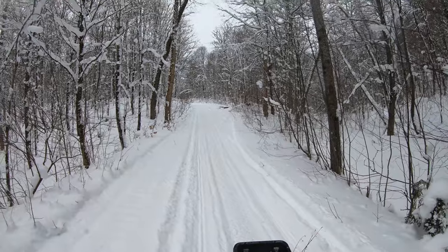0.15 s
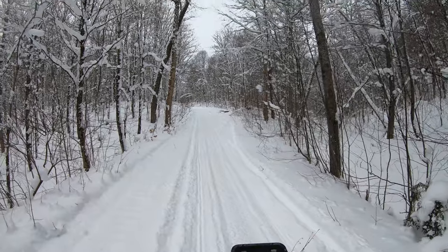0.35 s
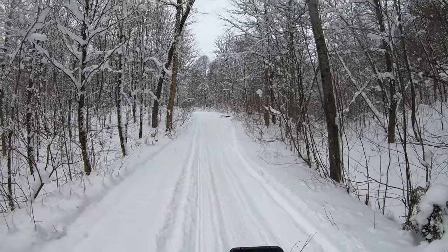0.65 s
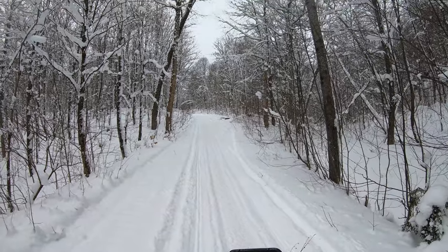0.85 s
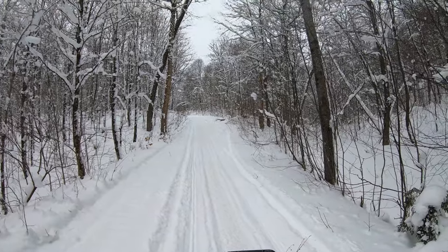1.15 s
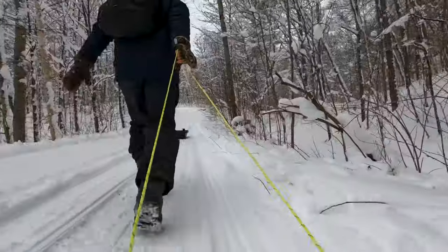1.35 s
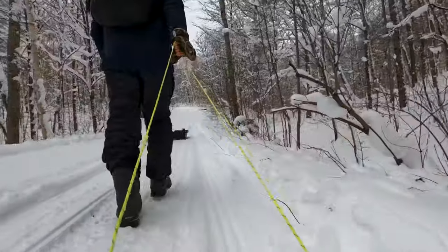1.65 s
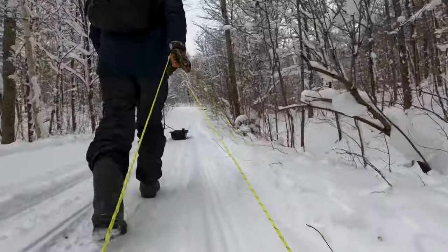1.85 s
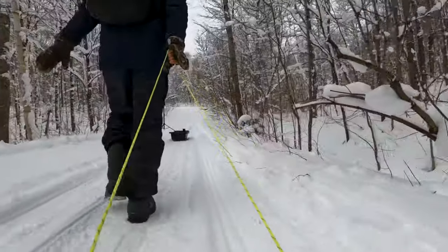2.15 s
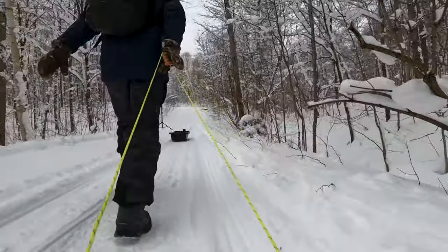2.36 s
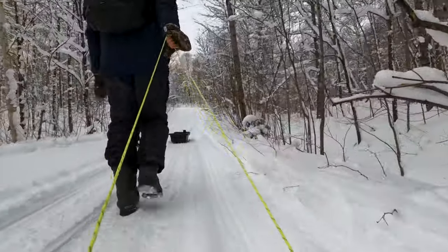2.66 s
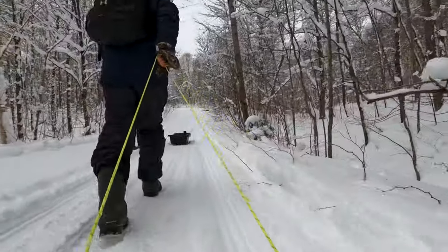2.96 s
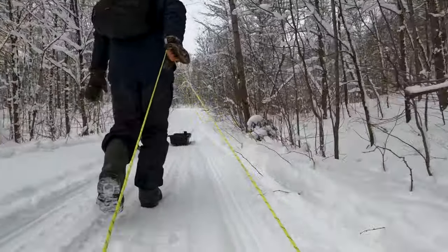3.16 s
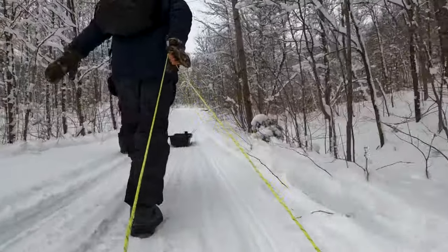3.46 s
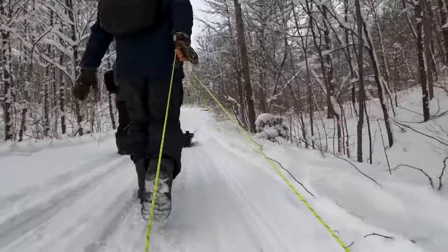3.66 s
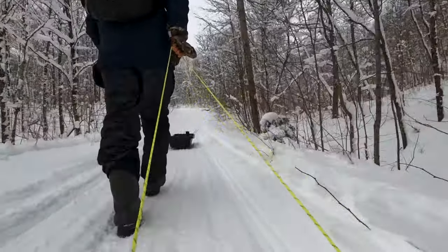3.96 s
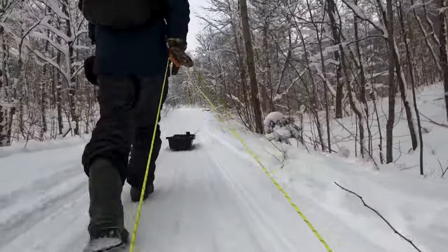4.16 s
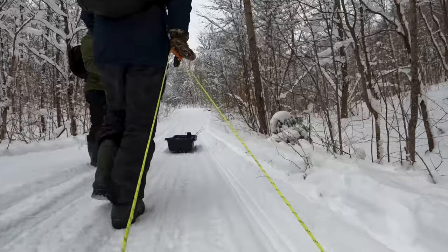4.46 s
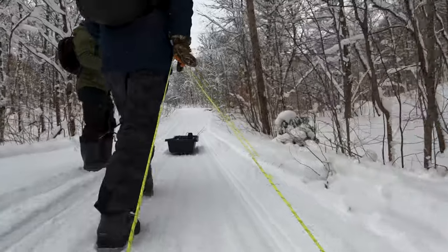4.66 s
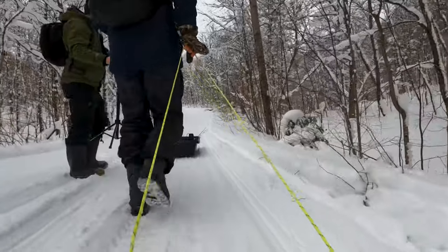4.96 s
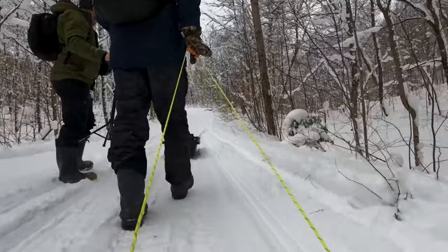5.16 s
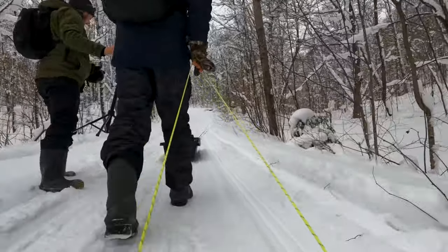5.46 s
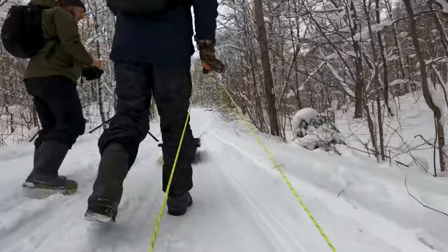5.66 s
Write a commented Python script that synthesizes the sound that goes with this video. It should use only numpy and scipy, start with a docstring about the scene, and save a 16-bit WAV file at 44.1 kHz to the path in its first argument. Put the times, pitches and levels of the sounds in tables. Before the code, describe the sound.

A plastic sled slides along a packed snow trail, heard from on board: a loud rumbling scrape with grainy hiss, low thuds and brittle crunches. Before it starts, there is a short, quieter stretch of gloves rustling and creaking on the camera, a sharp click with a thump, and a tiny gap. Late in the ride comes the hardest knock and a deep shudder, then more bumpy sliding.

```python
"""A snowy forest trail. First, close up, gloves rustle on a hand-held camera: the grip creaks in dull
pops, taps ring the case, and a button's click briefly ducks the level and comes with a low thump of air.
After a blink of silence, at 1.38 s, we ride a plastic sled: the hull rumbles and scrapes while packed
snow hisses and squeaks under it. Ridges thud, and crust crunches, knocks and snaps against the plastic.
Just after 4 s comes the hardest knock, a short hop and a deep shake, and the sled bumps on."""
import sys
import numpy as np
from scipy import signal
from scipy.fft import rfft, irfft, next_fast_len
from scipy.io import wavfile
from scipy.ndimage import uniform_filter1d

SR = 44100
rng = np.random.default_rng(int(sys.argv[2]) if len(sys.argv) > 2 else 0)


def store_pcm(level_fs):
    """Save levels as 16-bit WAV."""
    pcm = np.round(np.clip(level_fs, -1, 1) * 32767).astype(np.int16)
    wavfile.write(sys.argv[1], SR, np.atleast_2d(pcm).T)


N = 256568
TIME = np.arange(N) / SR
FFT_SIZE = next_fast_len(N)
BIN_HZ = np.maximum(np.arange(FFT_SIZE // 2 + 1) * SR / FFT_SIZE, 1)


def from_db(db):
    """Decibels to gain."""
    return 10 ** (np.asarray(db) / 20)


def unit_rms(x):
    """Scale to rms 1."""
    return x / np.sqrt(np.mean(x ** 2) + 1e-20)


def faders(rows):
    """Columns of a timed table as curves, one value a sample."""
    times, *columns = np.transpose(rows)
    return [np.interp(TIME, times, column) for column in columns]


def at_hz(curve, hz):
    """Read a curve on a log frequency axis."""
    points_hz, values = np.transpose(curve)
    return np.interp(np.log(hz), np.log(points_hz), values)


def drift(rate_hz):
    """Smooth random wander of rms 1."""
    pole = np.exp(-32 * np.pi * rate_hz / SR)   # one step every 16 samples
    slow = signal.lfilter([1], [1, -2 * pole, pole * pole], rng.standard_normal(N // 16 + 2002))[2000:]
    return np.interp(np.arange(N) / 16, np.arange(len(slow)), unit_rms(slow))


def colour(x, eq):
    """Shape a signal with an EQ curve."""
    return irfft(rfft(x, FFT_SIZE) * from_db(at_hz(eq, BIN_HZ)), FFT_SIZE)[..., :N]


def filtered(x, order, hz, kind="low"):
    """Low-, high- or band-pass filter."""
    return signal.sosfilt(signal.butter(order, hz, kind, fs=SR, output="sos"), x)


def ring(clicks, hz, t60):
    """Resonator: a unit click starts a decaying sine of height 1."""
    r, w = from_db(-60 / (t60 * SR)), 2 * np.pi * hz / SR
    return signal.lfilter([0, np.sin(w)], [1, -2 * r * np.cos(w), r * r], clicks + 1e-18)


def grains(per_s, spread_db):
    """Random clicks of uneven size and sign; rms 1."""
    sizes = from_db(spread_db * np.minimum(rng.exponential(1, N), 5)) * rng.choice([-1, 1], N)
    return unit_rms(sizes * (rng.random(N) < per_s / SR))


def arch(start, length):
    """Half-sine swell from 0 to 1 and back."""
    return np.sin(np.pi * np.clip((TIME - start) / length, 0, 1))


def pops(events, t60_cycles, rise_cycles):
    """Short pitched hits: damped sines with a soft attack."""
    out = np.zeros(N)
    for start, peak_db, hz in events:
        at = round(start * SR)
        cycles = np.arange(int(t60_cycles / hz * SR)) * hz / SR
        envelope = (1 - np.exp(-cycles / rise_cycles)) * from_db(-60 * cycles / t60_cycles)
        hit = envelope / envelope.max() * np.sin(2 * np.pi * cycles)
        out[at:at + len(hit)] += from_db(peak_db) * hit[:N - at]
    return out


# Stereo image at the two microphone ports: f/Hz, left-right correlation
PORT_LIKENESS = [(60, 0.31), (130, 0.95), (290, 1), (640, 0.27), (1410, -0.52), (3100, 0.33),
                 (6820, -0.017), (15000, -0.1)]
# Their pan: f/Hz, left minus right/dB
PORT_BALANCE = [(60, -10), (240, 4), (950, -6.5), (3770, -5), (15000, -9.5)]
def at_ports(noise_pair, eq):
    """Colour two unrelated noises and give them the width and pan of the ports; rms 1."""
    alike = np.clip(at_hz(PORT_LIKENESS, BIN_HZ), -1, 1)
    tilt = from_db(at_hz(PORT_BALANCE, BIN_HZ) / 2)
    mid, side = rfft(colour(noise_pair, eq), FFT_SIZE)
    mid, side = np.sqrt(1 + alike) * mid, np.sqrt(1 - alike) * side
    return unit_rms(irfft([(mid + side) * tilt, (mid - side) / tilt], FFT_SIZE)[:, :N])


# Faders of the handling bed: t/s, grip/dB, glove/dB, buzz/dB
HANDLING_FADERS = [(0.0, -40, -52.5, -52.5), (0.116, -43, -57, -50.5), (0.282, -44.5, -52.5, -50),
                   (0.7, -43, -49, -48), (0.858, -42.5, -46.5, -52), (0.968, -52, -50, -51.5),
                   (1.22, -48, -49, -47)]
# EQs of the dull grip, bright glove and midrange case buzz: f/Hz, level/dB
GRIP_EQ = [(65, -45), (110, -13.5), (183, -3.5), (482, -10.5), (617, -15), (900, -18), (1170, -21),
           (1980, -120)]
GLOVE_EQ = [(1300, -40), (2200, -15), (3000, -2.5), (5100, -5), (6000, -3), (8200, 1), (9500, -9),
            (11000, -22.5), (15000, -31), (16500, -60)]
BUZZ_EQ = [(410, -46), (700, -27), (1350, -7.5), (1590, -11), (1910, -11.5), (2400, -19), (3120, -20.5),
           (4000, -70)]
def handling():
    """A gloved hand shifts on the camera: low grip noise, cloth rustle and a buzz of the case."""
    grip_db, glove_db, buzz_db = faders(HANDLING_FADERS)
    grip = at_ports(rng.standard_normal((2, N)) * from_db(3.2 * drift(48)), GRIP_EQ)
    glove = at_ports(rng.standard_normal((2, N)) + 0.84 * grains(900, 3.6), GLOVE_EQ)
    buzz = at_ports(rng.standard_normal((2, N)) * from_db(3.4 * drift(59)), BUZZ_EQ)
    # small slips keep the lowest case mode ringing, out of phase at the ports
    buzz += from_db(1.5) * unit_rms(ring(grains(140, 4.7), hz=1350, t60=0.018)) * [[1], [-1]]
    return from_db(grip_db) * grip + from_db(glove_db) * glove + from_db(buzz_db) * buzz


# Jolts of the hand: t/s, level/dB
JOLTS = [(0.0, -55), (.272, -52), (.45, -47), (.762, -37.5), (.85, -48), (.978, -48), (1.224, -40),
         (1.275, -27)]
def jolts(rise_s=0.027, t60=0.21, floor_db=-84):
    """The hand jolts the camera: a deep rumble swells quickly and dies away."""
    eq = [(12, -33), (25, 1), (60, 9), (110, -25), (300, -70)]   # f/Hz, level/dB
    rumble = unit_rms(colour(rng.standard_normal((2, N)), eq))
    envelope = from_db(floor_db)
    for peak_s, level_db in JOLTS:
        attack = np.clip(1 + (TIME - peak_s) / rise_s, 0, 1)
        envelope = envelope + attack * from_db(level_db - 60 * np.maximum(TIME - peak_s, 0) / t60)
    return envelope * rumble


# Creaks of the grip: t/s, level/dB, f/Hz
CREAKS = [(0.018, -36, 297), (0.053, -38, 301), (0.083, -41, 487), (0.118, -38, 320), (0.134, -36, 315),
          (0.246, -32, 400), (0.333, -30, 334), (0.379, -41, 282), (0.418, -42, 290), (0.507, -39, 320),
          (0.53, -35, 452), (0.572, -33, 450), (0.589, -34, 404), (0.607, -30, 410), (0.638, -28, 410),
          (0.659, -29, 417), (0.701, -29, 484), (0.711, -34, 517), (0.751, -28, 490), (0.769, -27.5, 340),
          (0.805, -35, 266), (0.832, -24.5, 447), (0.84, -24.5, 366)]
def creaks():
    """The grip creaks in dull pops, each with a dry tick on its front."""
    starts, level_db, _ = np.transpose(CREAKS)
    ticks = np.zeros(N)
    ticks[np.round(starts * SR).astype(int)] = from_db(np.minimum(level_db, -34) - 9)
    return pops(CREAKS, t60_cycles=6.9, rise_cycles=0.6) + ring(ticks, hz=1800, t60=0.004)


# One scuff: t/s, length/s, f/Hz, level/dB
CASE_SCUFF = (.07, .14, 3200, -54)
def scuff():
    """A faint scuff on the case: narrow noise that swells and fades."""
    start, length, hz, level_db = CASE_SCUFF
    band = unit_rms(ring(rng.standard_normal((2, N)), hz, t60=0.0049))
    return from_db(level_db) * arch(start, length) * band


# Glove strokes: t/s, level/dB, attack/s, length/s, low crackle against bright/dB
SWISHES = [(0.09, -64, 0.034, 0.052, 22), (0.452, -37, 0.008, 0.043, 0),
           (0.746, -34.5, 0.013, 0.044, -13.5), (0.824, -53, 0.016, 0.046, 4),
           (0.936, -43.5, .02, 0.037, -46), (1.067, -44.5, 0.014, 0.052, -2.5),
           (1.177, -47.5, .02, 0.043, -1)]
def swishes(release_s=0.008):
    """A glove brushes the case in crackly strokes that rise, hold and fade quickly."""
    bright = rng.standard_normal((2, N)) * from_db(4.0 * drift(86)) + 0.45 * grains(700, 3.5)
    bright = at_ports(bright, GLOVE_EQ)
    crackle = at_ports(rng.standard_normal((2, N)) + 1.7 * grains(500, 4.1), BUZZ_EQ)
    out = np.zeros((2, N))
    for start, level_db, attack_s, length, crackle_db in SWISHES:
        attack = np.clip((TIME - start) / attack_s, 0, 1)
        release = np.clip((start + length - TIME) / release_s + 1, 0, 1)
        out += from_db(level_db) * attack * release * (bright + from_db(crackle_db) * crackle)
    return out


# Taps, ending on the button: t/s, level/dB, upper mode boost/dB, right gain of the two lowest modes
TAPS = [(0.1235, -33, -18, -0.6), (0.247, -39, -11, -0.66), (0.4517, -31.5, 6, -0.69),
        (0.4778, -46, 12, -1.1), (0.493, -47, -1, -0.54), (0.78, -45, 9, -0.63), (1.216, -41, -20, -0.65),
        (1.2729, -51, 5, -1.1), (1.2832, -18, 18, -1.65)]
# Modes of the case: f/Hz, level/dB, t60/s
CASE_MODES = [(1406, 18, 0.0069), (2760, 5, 0.0013), (4600, -9, 0.0051), (5900, -15, 0.0034),
              (7500, 5.5, 0.00054)]
# Touches within one tap: offset/s, level/dB
CHATTER = [(-0.0003, -14), (0.0, 0), (0.0004, -1), (0.0008, -14)]
def case_taps():
    """Each tap chatters on the case modes; the two lowest reach the ports out of phase."""
    starts, tap_db, upper_db, right_gain = np.transpose(TAPS)
    at, out = np.round(starts * SR).astype(int), np.zeros((2, N))
    for mode, (hz, mode_db, t60) in enumerate(CASE_MODES):
        drive = np.zeros((2, N))
        drive[:, at] = from_db(tap_db + (mode > 0) * upper_db + mode_db + rng.normal(0, 2.0, len(at)))
        drive[1, at] *= right_gain if mode < 2 else 1
        if mode == 0:   # fed through the mount, it swells first
            drive = ring(drive, hz, t60) * 2 * np.e * np.log(1000) / (t60 * SR)
        else:
            drive = sum(from_db(db) * np.roll(drive, round(lag * SR), axis=1) for lag, db in CHATTER)
        out += ring(drive, hz, t60)
    return filtered(out, 2, 11000)   # soft contact


# Pushes of air: port (0 left, 1 right), t/s, length/s, signed height, low cut/Hz
AIR_PUSHES = [(0, 1.277, .007, .14, 17), (1, 1.277, .007, -.2, 22), (0, 1.2835, .008, .4, 16),
              (1, 1.2835, .0065, -.65, 22), (0, 1.328, .05, .24, 4)]
def button_thump():
    """The finger squeezes air at the ports; a steep low cut makes each push swing on ever more slowly."""
    out = np.zeros((2, N))
    for port, start, length, height, cut_hz in AIR_PUSHES:
        out[port] += filtered(height * arch(start, length) ** 2, 4, cut_hz, "high")
    return out


def ducked(x, threshold_db, release_db_per_s):
    """Gain control: loud peaks turn the gain down, and it recovers slowly."""
    level_db = 20 * np.log10(uniform_filter1d(np.abs(x).max(axis=0), size=64) + 1e-9)
    ramp = release_db_per_s * TIME
    held_db = np.maximum.accumulate(level_db + ramp) - ramp
    over_db = np.maximum(held_db - threshold_db, 0)
    return x * from_db(-signal.lfilter([.006], [1, -.994], over_db))   # attack of about 4 ms


# Faders of the sliding hull: t/s, rumble/dB, scrape/dB
SLIDE_FADERS = [(1.39, -25.5, -27.5), (1.48, -18.5, -26.5), (1.51, -29, -31), (1.55, -22.5, -23.5),
                (1.8, -23.5, -24), (1.83, -12, -29), (1.88, -24, -24.5), (1.96, -12.5, -20),
                (2.0, -18, -24), (2.63, -17, -25), (2.68, -18.5, -25), (2.76, -20, -22.5),
                (2.78, -8.5, -17.5), (2.8, -19.5, -25.5), (3.58, -17.5, -24.5), (3.95, -17, -29),
                (4.13, -22, -28.5), (4.15, -20, -24), (4.17, -19.5, -26.5), (4.28, -23.5, -24.5),
                (4.37, -16.5, -24), (4.65, -23, -26.5), (4.69, -21.5, -28.5), (4.86, -17, -24),
                (4.9, -21, -22.5), (4.92, -14.5, -19), (4.97, -23, -27), (5.06, -14, -19.5),
                (5.17, -22, -26.5), (5.23, -17.5, -22.5), (5.32, -23.5, -27), (5.58, -25, -26),
                (5.69, -22.5, -21), (5.81, -26, -28.5)]
# Hull resonances: f/Hz, width/Hz, level/dB
HULL_MODES = [(144.6, 18, -6), (170, 10.4, -10.5), (230, 40, 1), (290, 63, 1.5), (374, 87, 0),
              (487, 63, -10), (656, 100, -5)]
# Boost of the two lowest resonances: t/s, level/dB
BELLY_FADER = [(1.39, 5.5), (2.5, 5.5), (2.9, -6.5), (3.7, -2), (4.2, 5), (5.2, -5.5), (5.81, 6.5)]
# EQ of the scrape: f/Hz, level/dB
SCRAPE_EQ = [(260, -17), (450, 4), (575, -4.5), (848, 4), (1220, -1), (1410, -13), (1700, -13.5),
             (2210, -48)]
def hull_slide(trail, fine, crust):
    """The uneven trail shoves the hull modes into a rumble while crust grains scrape the plastic."""
    rumble_db, scrape_db = faders(SLIDE_FADERS)
    belly_db, = faders(BELLY_FADER)
    rumble = np.zeros(N)
    for mode, (hz, width_hz, level_db) in enumerate(HULL_MODES):
        shove = rng.standard_normal(N) * from_db(1.24 * trail + 1.67 * drift(3.46))
        resonance = unit_rms(ring(shove, hz, t60=np.log(1000) / np.pi / width_hz))
        rumble += from_db(level_db + (mode < 2) * belly_db) * resonance
    rumble = filtered(rumble, 2, 90, "high")   # the hull radiates little below its lowest mode
    friction = (rng.standard_normal(N) + 0.65 * crust) * from_db(0.85 * trail + 0.5 * fine)
    scrape = colour(friction, SCRAPE_EQ)
    return from_db(rumble_db) * unit_rms(rumble) + from_db(scrape_db) * unit_rms(scrape)


# EQ of packed snow, for squeaks and hiss: f/Hz, level/dB
SNOW_EQ = [(820, -20), (1400, -4), (2400, -9), (3500, -11), (4300, -13), (5000, -14.5), (5600, -12.5),
           (6400, -15.5), (8000, -20.5), (11000, -33.5), (14300, -75)]
def squeaks(per_s=250, t60_cycles=49):
    """Packed snow squeaks under the hull: brief rings scattered over two octaves; rms 1."""
    pitches = np.geomspace(1800, 7000, 14)
    clicks, pitch_index = grains(per_s, 2.0), rng.integers(0, len(pitches), N)
    out = np.zeros(N)
    for k, hz in enumerate(pitches):
        t60 = t60_cycles / hz
        ping = ring(clicks * (pitch_index == k), hz, t60)
        out += from_db(at_hz(SNOW_EQ, hz)) * ring(ping, hz, t60) * hz / SR   # rung twice: soft attack
    return unit_rms(out)


# Faders of the top end: t/s, lower hiss/dB, upper hiss/dB, fizz/dB
HISS_FADERS = [(1.39, -31, -38, -50), (1.51, -33.5, -40.5, -55), (1.55, -22.5, -39, -39),
               (1.57, -32, -39, -52), (1.62, -27, -41, -45), (1.66, -28.5, -35.5, -46.5),
               (1.86, -32.5, -41, -54), (1.91, -29.5, -36.5, -50), (2.03, -31, -41.5, -51),
               (2.09, -29.5, -38, -49), (2.24, -36, -43, -60.5), (2.75, -37, -44.5, -61),
               (3.27, -39, -45.5, -63), (3.38, -32, -39, -54), (3.49, -34.5, -42, -55),
               (3.56, -34.5, -40.5, -56), (3.8, -33.5, -41.5, -57), (3.83, -35.5, -40.5, -52.5),
               (4.13, -33.5, -42.5, -56), (4.15, -33, -40, -43), (4.18, -35, -49, -63),
               (4.21, -31, -41, -57), (4.26, -34.5, -39.5, -52), (4.46, -30, -40, -48.5),
               (4.55, -26.5, -37, -48), (4.59, -33, -40, -49), (4.69, -29.5, -38.5, -52.5),
               (5.34, -33, -42, -56), (5.46, -31, -42.5, -52), (5.81, -28, -42.5, -53.5)]
# The hull skips clear of the snow and the hiss drops: t/s, length/s, level/dB
HOP = (4.166, .03, -6)
# EQs of the thin fizz and of the out-of-phase hiss that adds width: f/Hz, level/dB
FIZZ_EQ = [(10800, -55), (11300, -20), (11900, -1), (12450, 1.5), (13000, -3), (14000, -3.5), (15000, -8),
           (15700, -19), (15900, -51.5)]
SIDE_EQ = [(1000, -19), (3000, -5.5), (6000, 1), (10500, -10), (12000, -60)]
# Pan of the fizz, left then right: level/dB
FIZZ_PAN = [
    [7.5],
    [-5.5],
]
def snow_hiss(trail, fine, crust, split_hz=3480, squeak_db=-11, side_db=-39):
    """Snow rubs under the hull: a grainy, squeaky hiss topped by a fizz, mostly on the left."""
    low_db, high_db, fizz_db = faders(HISS_FADERS)
    friction = (rng.standard_normal(N) + 0.29 * crust) * from_db(0.57 * trail + 0.89 * fine)
    hiss = unit_rms(colour(friction, SNOW_EQ)) + from_db(squeak_db) * squeaks()
    low = signal.sosfiltfilt(signal.butter(2, split_hz, fs=SR, output="sos"), hiss)
    centre = from_db(low_db) * unit_rms(low) + from_db(high_db) * unit_rms(hiss - low)
    fizz = unit_rms(colour(rng.standard_normal((2, N)) * from_db(0.37 * trail + 1.6 * fine), FIZZ_EQ))
    side = unit_rms(colour(rng.standard_normal(N), SIDE_EQ)) * [[1], [-1]]
    mix = centre + from_db(high_db + side_db) * side + from_db(fizz_db + FIZZ_PAN) * fizz
    hop_start, hop_length, hop_db = HOP
    return mix * from_db(hop_db * arch(hop_start, hop_length))


# Fader of the deep shake: t/s, level/dB
SHAKE_FADER = [(1.39, -34), (1.89, -29.5), (3.17, -41.5), (4.13, -38), (4.21, -16.5), (4.31, -34),
               (5.66, -44), (5.74, -29), (5.81, -55)]
# Its EQ: f/Hz, level/dB
SHAKE_EQ = [(15, -28), (28, 8), (55, 7.5), (80, 8), (110, 6.5), (200, -55)]
def shake(trail):
    """The whole sled shakes on the uneven trail: surging sub-bass noise."""
    level_db, = faders(SHAKE_FADER)
    surges = rng.standard_normal(N) * from_db(2.9 * trail + 3.3 * drift(17))
    return from_db(level_db) * unit_rms(colour(surges, SHAKE_EQ))


# Ridges in the trail: t/s, level/dB, f/Hz
THUDS = [(1.454, -9, 185), (1.555, -10, 215), (1.594, -29, 332), (1.648, -11.5, 403), (1.763, -17, 230),
         (1.825, -12, 121), (1.934, -9, 214), (2.028, -8, 220), (2.118, -12, 210), (2.193, -13, 258),
         (2.323, -11, 144), (2.487, -11, 215), (2.56, -16, 220), (2.658, -14, 245), (2.682, -8, 230),
         (2.773, -10, 275), (2.932, -18, 290), (3.473, -9.5, 237), (3.697, -11.5, 284), (3.754, -11, 345),
         (3.861, -8.5, 190), (4.232, -22, 202), (4.293, -10.5, 294), (4.399, -14, 285), (4.439, -10, 254),
         (4.476, -13, 232), (4.562, -8, 265), (4.621, -8, 268), (4.846, -8.5, 230), (4.913, -8, 332),
         (5.05, -14, 327), (5.193, -9.5, 207), (5.225, -6.5, 222), (5.397, -17.5, 262), (5.482, -16.5, 280),
         (5.694, -15.5, 274)]
def thuds():
    """The hull bumps over ridges with low, quickly damped thuds."""
    return pops(THUDS, t60_cycles=20.7, rise_cycles=0.31)


# Breaks in the crust: t/s, level/dB, f/Hz
CRUNCHES = [(1.543, -22, 3970), (1.565, -29, 4500), (1.599, -25, 5000), (1.609, -22, 3800),
            (1.72, -23, 3030), (1.746, -22, 3050), (1.895, -18.5, 2500), (1.928, -20, 2200),
            (2.075, -19.5, 2000), (2.145, -25, 3500), (2.522, -25, 2380), (2.6, -32, 5900),
            (2.6194, -25, 2300), (3.3003, -23.5, 2340), (3.438, -23, 1950), (3.455, -34, 3830),
            (3.488, -23.5, 3100), (4.138, -16.5, 2130), (4.2014, -19, 1920), (4.229, -28, 2380),
            (4.244, -26, 2580), (4.288, -34, 2500), (4.329, -25, 2480), (4.387, -19.5, 2880),
            (4.492, -20, 2760), (4.538, -23, 2250), (4.909, -18, 1920), (5.441, -29, 3940),
            (5.7, -28, 4500)]
def crunches(rise_s=0.0026, t60=0.041, grit_db=3.0):
    """Crust gives way: a snap and a quick swell of grit that rings briefly and crumbles away."""
    out, t = np.zeros(N), np.arange(4000) / SR
    envelope = (1 - np.exp(-t / rise_s)) * from_db(-60 * t / t60)
    for start, level_db, hz in CRUNCHES:
        noise = rng.standard_normal(len(t))
        grit = noise * from_db(grit_db * np.abs(noise))   # a few grains stand out
        band = filtered(grit, 1, [hz / 1.3, hz * 1.6], "band")
        body = unit_rms(band) + 0.97 * unit_rms(ring(grit, hz, t60=0.017))
        snap = unit_rms(np.diff(grit, prepend=0) + 2 * band) * from_db(-18 - 60 * t / 0.017)
        at = round(start * SR)
        out[at:at + len(t)] += from_db(level_db) * (body * envelope + snap)[:N - at]
    return filtered(out, 2, 7500)


# Lumps of crust: t/s, level/dB, f/Hz
KNOCKS = [(1.553, -12, 1110), (1.612, -26, 880), (1.896, -12.5, 1240), (2.118, -14, 637),
          (2.21, -12.5, 790), (2.429, -13, 800), (2.704, -13, 820), (2.902, -18.5, 825), (4.1468, -4, 1075),
          (4.231, -14, 960), (4.397, -12.5, 1000), (4.439, -9, 1510), (4.475, -18, 1040), (4.495, -18, 866),
          (4.77, -18, 840), (4.999, -12, 774), (5.121, -13.5, 720), (5.243, -11.5, 656)]
def knocks():
    """Lumps of crust hit the hull with short midrange knocks."""
    return pops(KNOCKS, t60_cycles=17.1, rise_cycles=0.81)


# Snaps of brittle crust: t/s, level/dB
SNAPS = [(1.5546, -14.5), (1.6125, -24), (3.44, -34), (3.488, -19), (4.145, -22), (4.161, -19),
         (4.4045, -21), (4.4398, -19), (4.491, -17), (4.5375, -17)]
# Broad upper modes of the hull: f/Hz, level/dB
SNAP_MODES = [(1900, -3), (3000, 0), (4700, -4), (6700, -9)]
def snaps(t60=0.005, detune=0.1):
    """Brittle crust snaps against the plastic; the modes shift with the spot that is struck."""
    out, t = np.zeros(N), np.arange(round(t60 * SR))[:, None] / SR
    hz, mode_db = np.transpose(SNAP_MODES)
    for start, level_db in SNAPS:
        uneven, shift = rng.standard_normal((2, len(hz)))
        envelopes = from_db(level_db + mode_db + 2 * uneven - 60 * t / t60)
        modes = envelopes * np.sin(2 * np.pi * hz * (1 + detune * shift) * t)
        out[round(start * SR):][:len(t)] += modes.sum(axis=1)
    return out


def scene(camera_end_s=1.3481, sled_start_s=1.3784):
    """The camera in the hand, a blink of silence, then the sled ride."""
    camera = handling() + jolts() + creaks() + swishes() + scuff() + case_taps()
    camera = ducked(camera, threshold_db=-11.5, release_db_per_s=36) + button_thump()
    trail, fine = drift(14), drift(29)   # coarse and fine unevenness, shared so the layers move together
    crust = grains(700 * from_db(3.6 * trail), 2.5)
    sled = hull_slide(trail, fine, crust) + snow_hiss(trail, fine, crust) + shake(trail)
    sled += thuds() + crunches() + knocks() + snaps()
    return camera * (TIME < camera_end_s) + sled * np.clip((TIME - sled_start_s) / 0.0015, 0, 1)


def record(dry):
    """Soft saturation rounds the peaks, and a steep low-pass cuts the very top."""
    top_cut = signal.cheby2(14, 100, 16800, fs=SR, output="sos")
    return signal.sosfilt(top_cut, 1.142 * np.tanh(dry / 1.268))


dry = scene()
out = record(dry)
store_pcm(out)
```